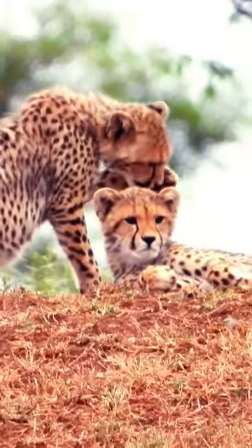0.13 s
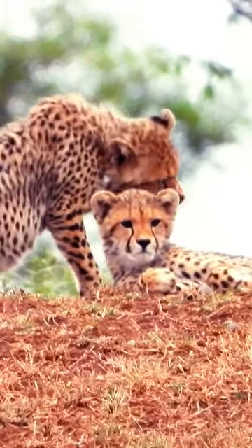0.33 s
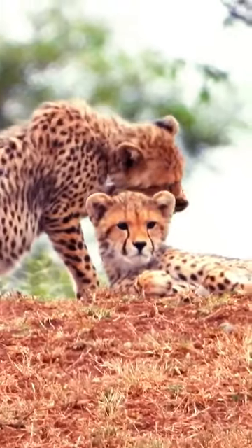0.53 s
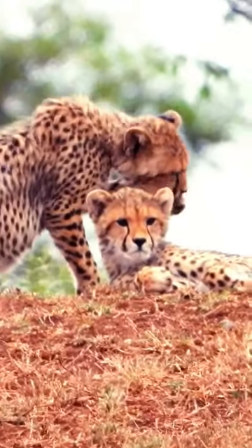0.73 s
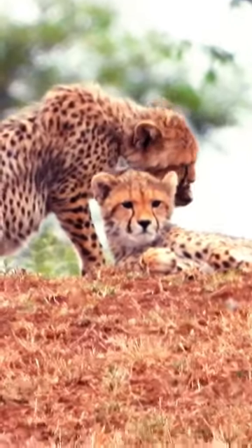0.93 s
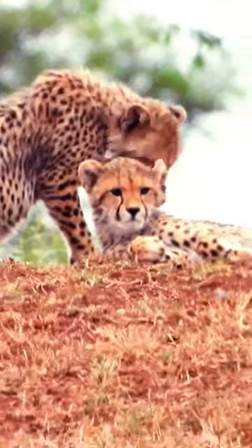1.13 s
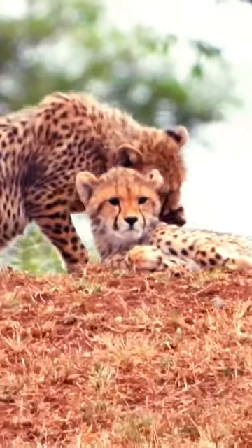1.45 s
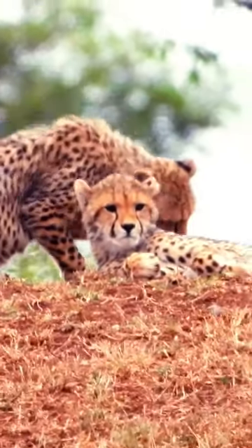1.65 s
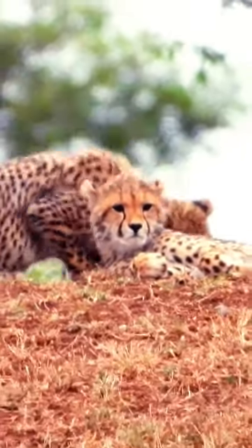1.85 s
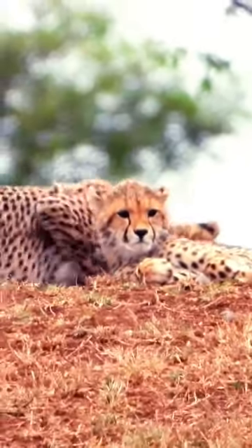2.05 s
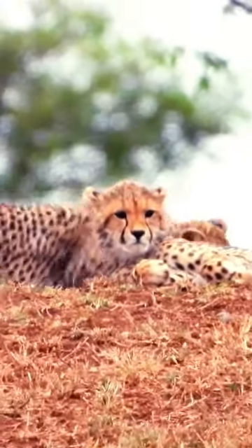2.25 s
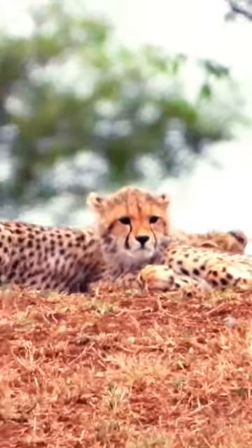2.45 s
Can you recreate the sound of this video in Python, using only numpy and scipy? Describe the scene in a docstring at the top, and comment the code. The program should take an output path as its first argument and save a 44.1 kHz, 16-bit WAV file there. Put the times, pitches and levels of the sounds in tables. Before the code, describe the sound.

Wind buffets the microphone in open grassland, a low rumble that grows into stronger gusts. Faint piping chirps and thin bird trills repeat over a distant engine hum, and two dull knocks bump the microphone in the second half.

```python
"""Wind buffets the microphone in open grassland: swaying bands of low noise that swell with each gust.
Behind it the air rustles and a distant engine idles with a steady-pitched hum. Short piping chirps
repeat near 1.3 kHz; small birds add arched trills, a burbling phrase and thin peeps, all whistled tones
with faint echoes from ground and trees. Now and then the capsule is pushed and snaps back with a knock;
after the two loud knocks the background ducks, a limiter's dip written into its level curves."""
import sys
import numpy as np
from scipy import signal
from scipy.fft import rfft, irfft
from scipy.io import wavfile

SR = 44100
rng = np.random.default_rng(int(sys.argv[2]) if len(sys.argv) > 2 else 0)


def dump(signal):
    """Clip the signal to [-1, 1] and save it as 16-bit WAV at the path in sys.argv[1]."""
    limited = np.clip(np.atleast_2d(signal).T, -1, 1)
    pcm = np.round(limited * 32767).astype(np.int16)
    wavfile.write(sys.argv[1], SR, pcm)


N = 114660


def amp(db):
    """Decibels to gain."""
    return 10 ** (np.asarray(db) / 20)


def unit_rms(x):
    """Scale to rms 1."""
    return x / np.sqrt(np.mean(x ** 2) + 1e-20)


def curves(rows):
    """The columns of a timed table, sample by sample."""
    times, *columns = np.transpose(rows)
    return [np.interp(np.arange(N) / SR, times, column) for column in columns]


def drift(rate_hz):
    """A slow random curve with a spread of about 1."""
    step, settle = 40, 2000
    pole = np.exp(-2 * np.pi * rate_hz * step / SR)
    noise = rng.standard_normal(N // step + settle + 2)
    slow = signal.lfilter([1], [1, -2 * pole, pole * pole], noise)[settle:]
    return np.interp(np.arange(N) / step, np.arange(len(slow)), unit_rms(slow))


def noise_band(low_hz, high_hz):
    """Band-passed white noise."""
    bandpass = signal.butter(2, [low_hz, high_hz], "band", fs=SR, output="sos")
    return signal.sosfilt(bandpass, rng.standard_normal(N))


def coloured_noise(spectrum):
    """Noise shaped by a spectrum, silent below its first point; rms 1."""
    hz, db = np.transpose(spectrum)
    bin_hz = np.arange(N // 2 + 1) * SR / N + 1
    gain = amp(np.interp(np.log(bin_hz), np.log(hz), db, left=-99))
    return unit_rms(irfft(rfft(rng.standard_normal(N)) * gain, N))


def add_whistle(out, start, hz, rms, taper):
    """Add a sine that follows a pitch curve, with rounded ends."""
    i = int(start * SR)
    envelope = np.sqrt(2) * rms * signal.windows.tukey(len(hz), taper)
    tone = envelope * np.sin(2 * np.pi * np.cumsum(hz) / SR)
    out[i:i + len(hz)] += tone[:N - i]


def buffet(centre_hz, half_width_hz, sway=0.06, steadiness=0.34):
    """One narrow band of wind noise, its centre swaying and its loudness partly evened out; rms 1."""
    noise = rng.standard_normal(N + SR) + 1j * rng.standard_normal(N + SR)
    envelope = signal.sosfilt(signal.butter(3, half_width_hz, fs=SR, output="sos"), noise)[SR:]
    power = np.abs(envelope) ** 2
    envelope /= (power + 0.12 * power.mean()) ** (steadiness / 2)
    hz = centre_hz * (1 + sway * drift(2.947))
    return unit_rms(np.real(envelope * np.exp(2j * np.pi * np.cumsum(hz) / SR)))


# Low, middle and upper bands of wind on the microphone: (centre [Hz], half width [Hz])
BUFFET_BANDS = [(62, 14), (99, 19), (155, 27.7)]
# Gusts in those bands: (time [s], low level [dB], middle level [dB], upper level [dB])
GUSTS = [(0.0, -27, -29, -31), (0.19, -23.5, -32, -27), (0.22, -21, -34, -21), (0.28, -36.5, -28, -26.5),
         (0.71, -19.5, -26.5, -22.5), (0.75, -22, -28, -29.5), (0.8, -14, -14.5, -15.5),
         (0.83, -8, -29, -16), (0.85, -5, -16, -36), (0.89, -25.5, -21.5, -17.5), (1.01, -18.5, -19, -24.5),
         (1.04, -17.5, -7, -14), (1.13, -14, -14.5, -17.5), (1.22, -18, -20.5, -23),
         (1.24, -8.5, -13.5, -23), (1.3, -25.5, -24.5, -38), (1.34, -6, -14.5, -36),
         (1.36, -13, -19, -16.5), (1.45, -17.5, -16, -25), (1.53, -14, -13, -12), (1.61, -20, -24, -32),
         (1.64, -18.5, -18, -26.5), (1.71, -13, -17, -31), (1.8, -18.5, -17, -18),
         (1.88, -36, -14.5, -30.5), (1.93, -13.5, -30, -24.5), (2.14, -15.5, -8, -20),
         (2.18, -19, -17, -36), (2.24, -23, -17.5, -20.5), (2.32, -21, -21, -38.5), (2.5, -35.5, -44, -44),
         (2.6, -23.5, -43, -36.5)]
# The wind below and above them: (time [s], rumble level [dB], relative edge level [dB])
RUMBLE_AND_EDGE = [(0.0, -31, -43), (0.09, -42, -48), (0.74, -30.5, -41), (0.95, -20.5, -41.5),
                   (1.04, -35, -30.5), (1.29, -22.5, -42.5), (1.4, -42, -33), (1.48, -17, -38.5),
                   (1.53, -17.5, -25), (1.61, -23.5, -49.5), (1.7, -20, -33.5), (1.73, -48, -34),
                   (1.93, -23, -44), (1.99, -46, -37.5), (2.06, -24, -39), (2.15, -19, -30.5),
                   (2.19, -26.5, -50.5), (2.27, -30, -45.5), (2.34, -31, -45), (2.6, -30.5, -47.5)]
def wind():
    """Gusts right on the microphone: three bands of buffeting between a deep rumble and a brighter edge."""
    rumble_db, edge_db = curves(RUMBLE_AND_EDGE)
    edge = unit_rms(noise_band(200, 347) * amp(1.9 * drift(21)))
    buffets = sum(amp(db) * buffet(*band) for db, band in zip(curves(GUSTS), BUFFET_BANDS))
    rumble = buffet(centre_hz=34, half_width_hz=12.3)
    return buffets + amp(rumble_db) * rumble + amp(edge_db - 0.5) * edge


# Background rustle and hiss, ducked abruptly by the recorder's limiter after the two loud knocks,
# then recovering: (time [s], relative rustle level [dB], relative hiss level [dB])
BACKGROUND_LEVELS = [(0, -49.5, -65), (.25, -48, -62), (.55, -45, -60), (.75, -44.5, -58),
                     (1.2, -44, -58.5), (1.53, -43.5, -57.5), (1.695, -43, -57.5), (1.705, -44, -60),
                     (1.98, -45.5, -60), (2.14, -42, -58.5), (2.15, -50, -63), (2.37, -49, -63),
                     (2.6, -44.5, -61.5)]
# Colours of the rustle and of the hiss: (frequency [Hz], relative density [dB])
RUSTLE_SPECTRUM = [(140, -27.5), (230, -3), (243, -1), (296, -2.5), (338, -16.5), (478, -3.5), (553, -16),
                   (857, -13.5), (1380, -22), (2000, -21.5), (2290, -26.5), (3740, -29), (5500, -40.5),
                   (7150, -62.5), (12100, -120)]
HISS_SPECTRUM = [(1760, -18.5), (3000, -14), (4450, -9.5), (5430, -8), (10100, -10), (15300, -16)]
def rustle_and_hiss():
    """Background rustle and hiss, following level curves that hold the limiter's dips and recovery."""
    rustle_db, hiss_db = curves(BACKGROUND_LEVELS)
    rustle = amp(rustle_db + 3.5 + 1.1 * drift(24)) * coloured_noise(RUSTLE_SPECTRUM)
    hiss = amp(hiss_db + 1 + 0.73 * drift(4)) * coloured_noise(HISS_SPECTRUM)
    return rustle + hiss


# The engine in the distance: (centre [Hz], width [Hz], level before the swell [dB])
HUM_BANDS = [(198.64, 14, -36.5), (287, 15.3, -57), (459.3, 42, -63), (588.5, 42, -59), (861, 62, -57.5)]
def engine_hum():
    """An engine idling far off: narrow bands of noise that swell and duck with the rustle."""
    hum = sum(amp(db) * unit_rms(noise_band(hz - width / 2, hz + width / 2))
              for hz, width, db in HUM_BANDS)
    rustle_db, _ = curves(BACKGROUND_LEVELS)
    swell = amp(1.5 * (rustle_db - rustle_db.mean()))
    return swell * hum


# Small birds in the field: (time [s], length [s], level [dB], first pitch [Hz], last pitch [Hz])
BIRD_NOTES = [(.11, .035, -68, 6250, 6280), (.144, .012, -61, 4600, 4400), (.385, 0.022, -62, 4900, 4770),
              (0.418, .015, -65, 4830, 4750), (0.61, 0.013, -63, 4800, 4760),
              (0.651, .014, -62, 4700, 4810), (0.846, .014, -57, 3980, 4470),
              (0.668, 0.013, -60, 4350, 4300), (0.68, .015, -59, 4850, 4750), (.7, 0.035, -60, 4380, 4130),
              (1.29, 0.037, -65, 5000, 5155), (1.421, 0.015, -57, 3850, 3860),
              (1.612, .02, -64, 5370, 5380), (1.921, 0.055, -69, 3780, 3850),
              (1.947, 0.039, -60, 2870, 2880), (2.37, 0.035, -70, 5800, 5800),
              (2.429, .04, -72, 4850, 4545), (2.511, 0.043, -68, 4750, 4850),
              (0.972, .045, -63.5, 6290, 6240), (1.34, .036, -64, 6280, 6280),
              (2.344, 0.0099, -52, 3420, 4094), (2.355, .037, -54.5, 1910, 2230),
              (2.393, 0.011, -48, 2750, 2080), (2.414, .009, -52.5, 2750, 2080),
              (2.492, .008, -57, 4200, 4750), (2.496, 0.011, -48, 3240, 4000),
              (2.512, 0.036, -53, 1920, 2070), (2.534, 0.012, -43.5, 2320, 2240),
              (2.562, 0.0077, -45.5, 3000, 2150), (2.59, 0.0081, -44, 2980, 2060),
              (2.575, 0.021, -67, 4943, 4756)]
def bird_notes():
    """Thin peeps and a late burbling phrase, each note a whistle in one straight glide."""
    out = np.zeros(N)
    for start, length, db, from_hz, to_hz in BIRD_NOTES:
        add_whistle(out, start, np.linspace(from_hz, to_hz, int(length * SR)), amp(db), taper=0.42)
    return out


# At the capsule: (time [s], level before dulling [dB], push rate [Hz], low-pass [Hz], crisp part [0-1])
KNOCKS = [(0.409, -35, 2966, 8000, .4), (1.702, -20.5, 220, 790, .04), (2.1436, -16, 180, 700, 0.23),
          (2.313, -28, 700, 2000, .03)]
def capsule_knocks():
    """The capsule is pushed and snaps back: a quick swell, a sudden flip and a decay, mostly dulled."""
    out, half = np.zeros(N), 500
    t = np.arange(-half, half) / SR
    for time, db, push_hz, dull_hz, crisp in KNOCKS:
        flip = -np.sign(t) * np.exp(-2 * np.pi * push_hz * np.abs(t))
        pole = np.exp(-2 * np.pi * dull_hz / SR)
        dulled = signal.lfilter([1 - pole], [1, -pole], flip)
        i = int(time * SR)
        out[i - half:i + half] += amp(db) * (dulled + crisp * flip)
    return out


# Trills, faint at the microphone: (time [s], length [s], base level [dB])
TRILL_CALLS = [(0.612, 0.12, -71), (0.854, 0.16, -66), (1.157, 0.14, -61.5), (1.462, 0.17, -62),
               (1.728, .158, -60.5), (2.116, 0.15, -62.5)]
# One trill: (progress [0-1], upper pitch [Hz], upper gain [dB], lower pitch [Hz], lower gain [dB])
TRILL_ARCH = [(0, 3900, 0, 3900, -3), (.07, 4500, 5, 3950, 3), (.13, 4700, -2, 4000, -6),
              (.6, 4620, -3, 3930, -2), (.76, 4530, -3, 3780, 1), (.83, 4380, 6, 3620, -8),
              (.91, 4030, 2, 3500, -25), (1, 3450, -1, 3400, -25)]
def bird_trills(flutter_hz=150, flutter_depth=0.7):
    """A small bird whistles with two voices that rise and fall in a rough, fluttering arch."""
    out = np.zeros(N)
    progress, *arch = np.transpose(TRILL_ARCH)
    roughness = amp(3.2 * drift(43))
    waver_hz = 35 * drift(40)
    for start, length, db in TRILL_CALLS:
        t = np.arange(int(length * SR)) / SR
        span = int(start * SR) + np.arange(len(t))
        upper_hz, upper_db, lower_hz, lower_db = [np.interp(t / length, progress, c) for c in arch]
        flutter = (1 + flutter_depth * np.sin(2 * np.pi * flutter_hz * t)) * roughness[span]
        add_whistle(out, start, upper_hz + waver_hz[span], amp(db + upper_db) * flutter, taper=0.059)
        add_whistle(out, start, lower_hz - waver_hz[span], amp(db + lower_db) * flutter, taper=0.069)
    return out


# Piping, the clearest call at the microphone: (time [s], length [s], level before fading [dB], pitch [Hz])
PIPING_CALLS = [(0.715, 0.043, -52.5, 1346), (1.185, 0.04, -42, 1330), (1.527, 0.039, -35, 1325),
                (1.758, 0.04, -38, 1314), (1.968, 0.04, -38.5, 1316), (2.169, 0.03, -42.5, 1346),
                (2.36, 0.043, -40.5, 1330), (2.544, 0.045, -39, 1353)]
def piping_chirps(scoop_hz=110, scoop_s=0.0091, climb_hz_per_s=1330, fade_db_per_s=150):
    """Pure piping notes that scoop up to pitch, then climb a little while fading."""
    out = np.zeros(N)
    for start, length, db, hz in PIPING_CALLS:
        t = np.arange(int(length * SR)) / SR
        pitch = hz - scoop_hz * np.exp(-t / scoop_s) + climb_hz_per_s * (t - length / 2)
        add_whistle(out, start, pitch, amp(db - fade_db_per_s * t), taper=0.68)
    return out


# Longer paths to the microphone: (delay [s], gain [dB])
REFLECTIONS = [(0.009, -7), (0.021, -17.5), (.041, -23.5)]
def with_echoes(direct):
    """The direct sound and a few faint echoes from ground and trees."""
    return direct + sum(amp(db) * np.pad(direct, (int(delay * SR), 0))[:N] for delay, db in REFLECTIONS)


def scene():
    """One microphone in open grassland: wind and knocks at the capsule, engine and birds farther out."""
    bed = wind() + engine_hum() + rustle_and_hiss()
    calls = bird_notes() + bird_trills() + piping_chirps()
    return (bed + capsule_knocks() + with_echoes(calls))[None]


def record(dry, ceiling=0.98, cutoff_hz=15480):
    """The highest peaks are rounded and the top treble is cut steeply."""
    rounded = dry / (1 + np.abs(dry / ceiling) ** 8) ** (1 / 8)
    return signal.sosfilt(signal.ellip(12, 0.5, 70, cutoff_hz, fs=SR, output="sos"), rounded)


dry = scene()
out = record(dry)
dump(out)
```